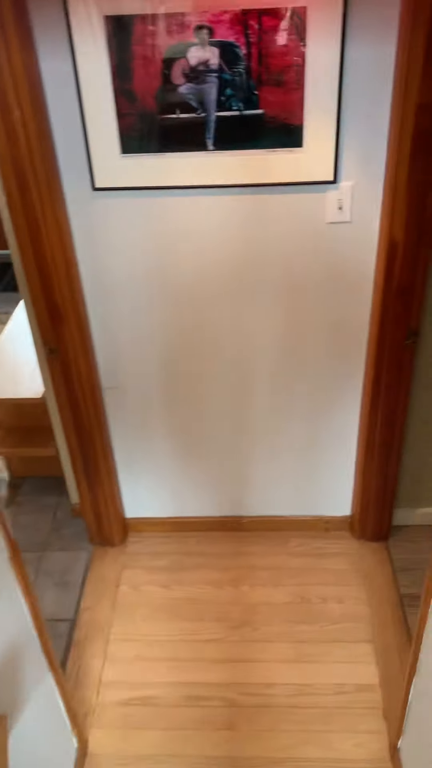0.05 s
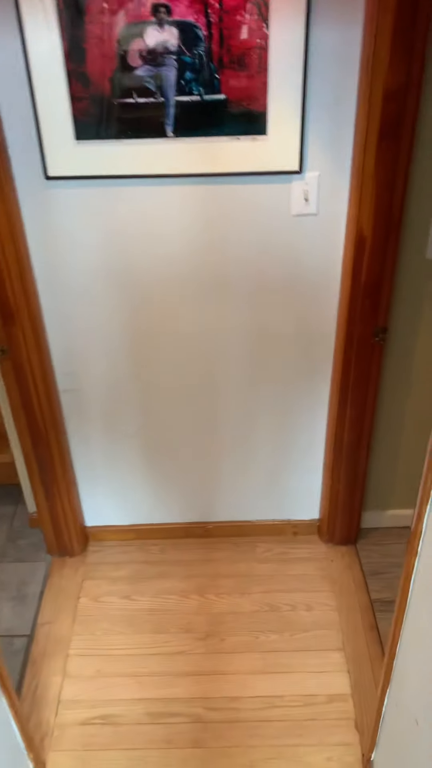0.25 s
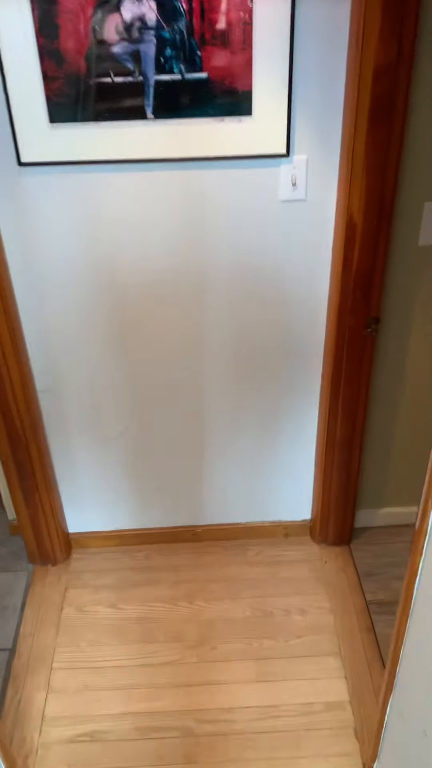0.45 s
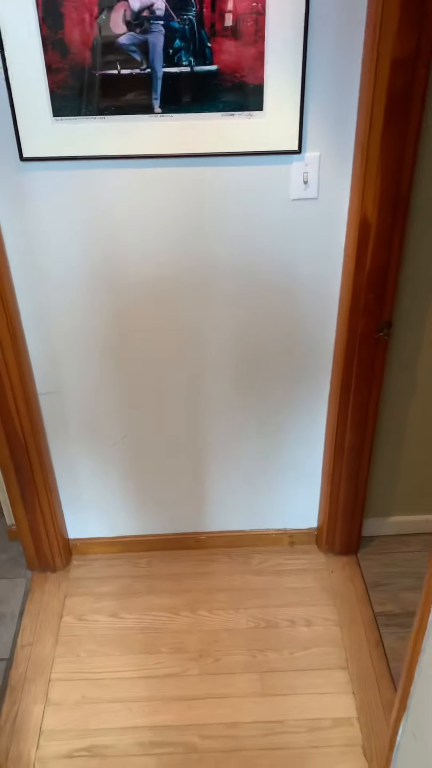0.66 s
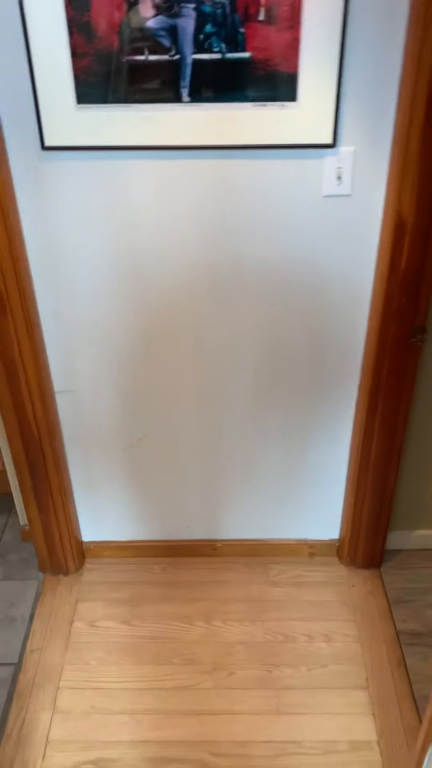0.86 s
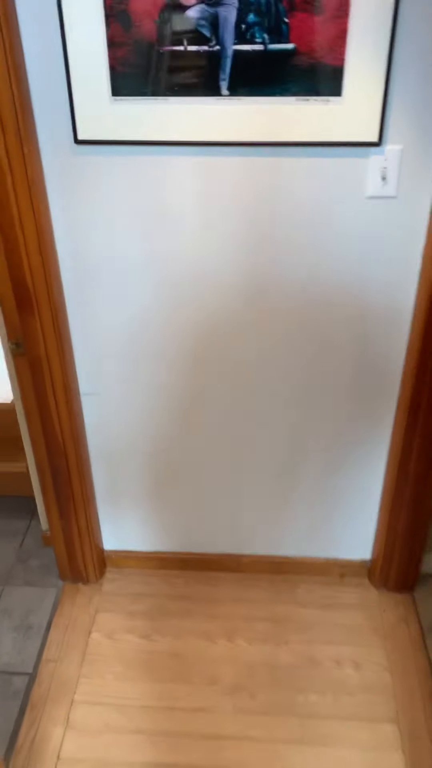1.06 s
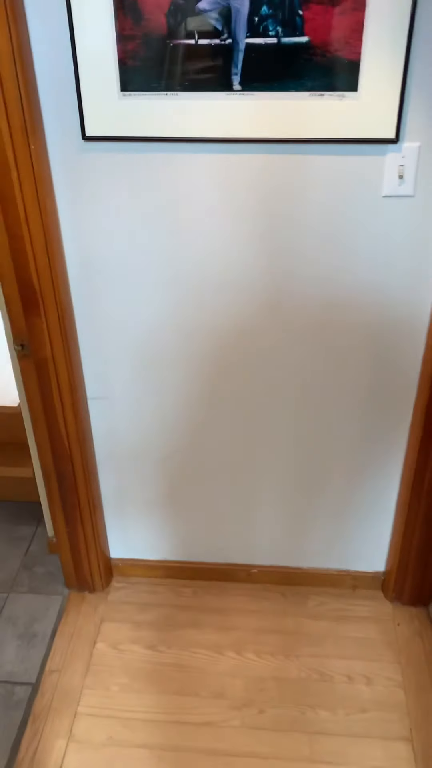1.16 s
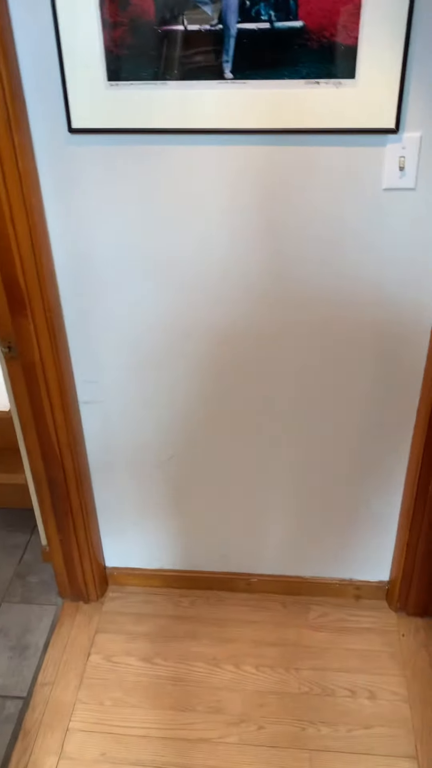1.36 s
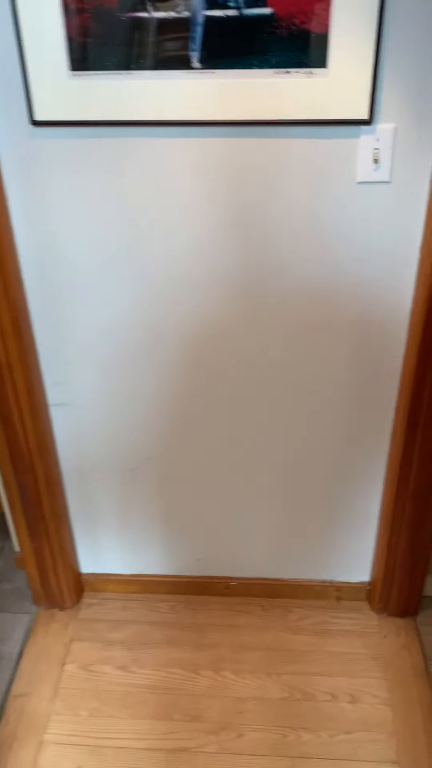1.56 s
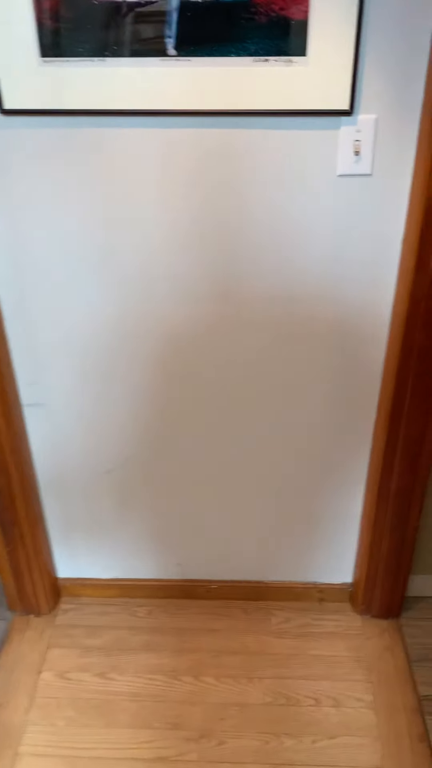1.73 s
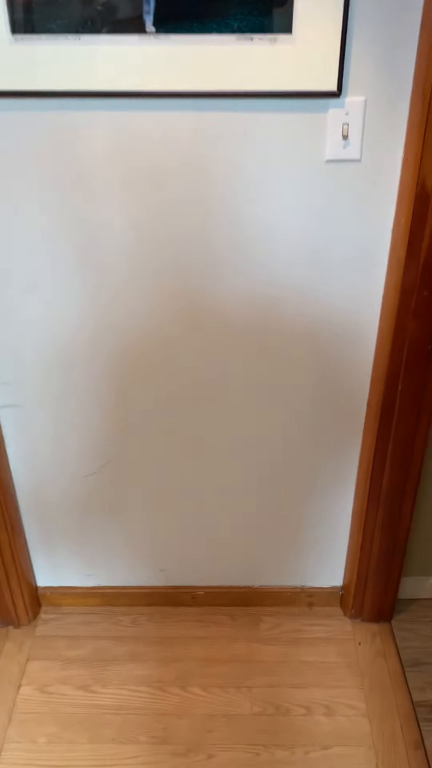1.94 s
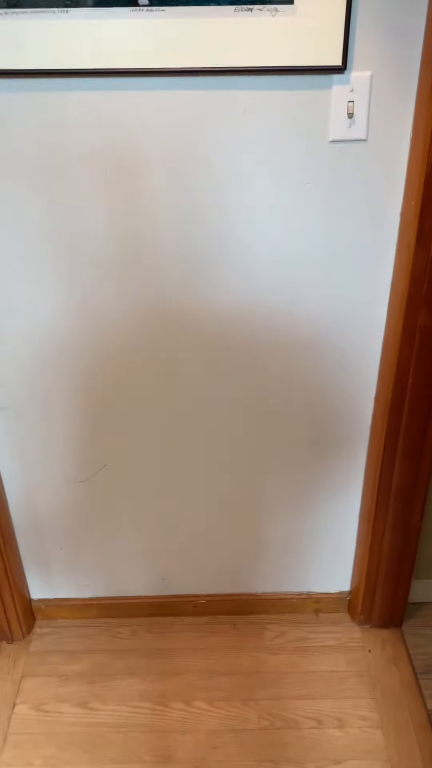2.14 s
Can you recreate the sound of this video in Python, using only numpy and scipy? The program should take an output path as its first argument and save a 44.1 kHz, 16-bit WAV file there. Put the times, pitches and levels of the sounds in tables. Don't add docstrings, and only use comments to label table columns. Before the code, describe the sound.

Barefoot steps thud and creak across indoor wooden boards, following a harsh close click

```python
import sys
import numpy as np
from scipy import signal
from scipy.fft import rfft, irfft
from scipy.io import wavfile
from scipy.ndimage import uniform_filter1d

SR = 44100
rng = np.random.default_rng(int(sys.argv[2]) if len(sys.argv) > 2 else 0)


def field_ratio(decibels):
    return 10 ** (np.asarray(decibels, dtype=float) / 20)


def dump_mix(stems):
    frames = np.atleast_2d(stems).T
    limited = np.clip(frames, -1, 1)
    pcm = np.round(limited * 32767).astype(np.int16)
    wavfile.write(sys.argv[1], SR, pcm)


N = 97020

# [f/Hz, density/dB]
AIR_SPECTRUM = [(20, 0), (85, 2.5), (160, -13.5), (300, -10.5), (700, -11.5), (900, -15.5), (4000, -23),
                (16000, -26)]
# [f/Hz, level/dB]
HUM_MODES = [(448, -81.5), (285, -80.5)]
# [f/Hz, level/dB, fade/(dB/s)]
WHINE_TONE = (678, -66, -5.5)
# [t/s, level/dB]
RUSTLE_LEVEL = [(0, -68.5), (.22, -65), (.3, -62.5), (.5, -66), (.6, -72), (.8, -77.5), (.9, -70.5),
                (1.25, -66), (1.45, -70), (1.6, -64.5), (1.67, -60), (1.77, -63), (1.81, -67),
                (1.94, -66.5), (2.0, -62.5), (2.09, -63), (2.2, -70)]
# [f/Hz, density/dB]
CLOTH_SPECTRUM = [(500, -12), (900, -0.5), (2200, -4.5), (3500, -6.5), (7500, -8), (10000, -5.5),
                  (13500, -7.5), (16000, -12)]
# [t/s, level/dB, f/Hz, length/s]
CLOTH_TICKS = [
    (1.748, -51, 6000, 0.0011),
    (1.847, -52, 9000, 0.0012),
    (2.037, -56, 9000, 0.0019),
    (2.062, -65, 9700, .035),
]
# [t/s, level/dB, fall/s, sag level/dB]
CATCH_SNAPS = [
    (.056595, .6, .0003, -29.5),
    (.060115, .6, .0003, -48),
    (.061248, .6, .00042, -45),
]
# [f/Hz, level/dB]
CATCH_MODES = [(10250, 0), (6200, -12), (13200, -14), (2620, -27), (1150, -31)]
# [t/s, level/dB]
WEIGHT_LEVEL = [(.175, -59.5), (.19, -57.5), (.3, -40), (.4, -51.5), (.49, -47.5), (.52, -57), (.565, -57),
                (.6, -62.5), (.99, -78), (1.012, -45.5), (1.18, -44.5), (1.3, -54.5), (1.56, -64),
                (1.68, -56), (1.8, -68.5), (2.015, -54), (2.035, -48.5), (2.2, -58)]
# [f/Hz, width/Hz, level/dB]
BOARD_MODES = [(191, 50, -4), (263.8, 66, -0.5), (320, 50, -6), (400, 42, -2.5), (470, 40, -4),
               (560, 70, -6.5), (680, 60, -11), (800, 90, -12.5), (1052.3, 150, -20.5), (130, 61, -5)]
# [t/s, level/dB, t60/s, tilt/(dB/octave), top f/Hz]
SKIN_SLAPS = [
    (.181, -47, 0.23, -6, 6000),
    (.234, -43.5, 0.23, -4.5, 13000),
    (.29, -55, 0.24, -5.5, 7000),
    (.445, -50.5, 0.31, -5.5, 6000),
    (0.509, -46.5, 0.033, -2.5, 5000),
    (1.006, -44, 0.24, -6, 9100),
    (1.119, -41.5, 0.22, -8.5, 4000),
    (1.14, -69, 1.2, -3.5, 9000),
    (2.027, -52, 0.34, -8.5, 9000),
]
# [t/s, length/s, level/dB, f/Hz]
BOARD_KNOCKS = [(.182, 0.014, -44.5, 750), (.182, 0.008, -47.5, 1470), (.236, 0.039, -43, 415),
                (.236, 0.034, -55, 1620), (.278, 0.015, -42.5, 470), (.357, 0.021, -37, 271),
                (.385, 0.025, -42, 205), (.445, 0.021, -47.5, 760), (.445, 0.012, -52, 1137),
                (.503, 0.059, -44, 285), (.504, 0.036, -46.5, 498.4), (1.008, 0.076, -46.5, 285),
                (1.117, 0.021, -44, 515), (1.124, 0.019, -47, 750), (2.032, 0.022, -54, 623),
                (1.17, 0.0096, -48.5, 410), (1.312, 0.017, -55.5, 470), (1.419, 0.024, -51, 437),
                (1.675, .025, -56, 301), (2.028, 0.021, -50.5, 286), (2.095, 0.015, -48.5, 287)]
# [t/s, length/s, level/dB, f/Hz]
JOIST_BOOMS = [(.183, 0.027, -37, 108), (.236, .028, -39, 87), (.278, 0.053, -39, 85),
               (.343, 0.0077, -29.5, 105), (.375, 0.024, -40.5, 96), (.503, 0.055, -49, 109.5),
               (.77, 0.021, -52.5, 92.2), (1.012, 0.049, -34.5, 98), (1.08, 0.093, -39.5, 102.5),
               (1.172, .045, -35.5, 102.5), (1.245, 0.068, -38.5, 90.7), (1.582, 0.028, -50.5, 80),
               (2.03, .018, -33, 91), (2.09, .11, -45, 86)]
# [start t/s, end t/s, level/dB, f/Hz, width/Hz]
SOLE_DRAG = (1.12, 1.46, -69, 2380, 420)


def evened(x):
    return x / np.sqrt(np.mean(x ** 2) + 1e-20)


def add(mix, s, sound):
    part = mix[round(s * SR):][:len(sound)]
    part += sound[:len(part)]


def curve(points):
    return field_ratio(np.interp(np.arange(N) / SR, *np.transpose(points)))


def coloured(points, patchy_db):
    hz = np.fft.rfftfreq(1024, 1 / SR)
    real, imag, patches = rng.standard_normal((N // 256 + 5, 513, 3)).T
    patches = uniform_filter1d(patches, size=14, axis=0)
    patches = evened(uniform_filter1d(patches, size=10, axis=1))
    f, db = np.transpose(points)
    density_db = np.interp(np.log(hz + 1), np.log(f + 1), db)[:, None]
    spectra = (real + 1j * imag) * field_ratio(density_db + patchy_db * patches)
    return evened(signal.istft(spectra, nperseg=1024, noverlap=768)[1][:N])


def resonate(x, hz, width):
    r = np.exp(-np.pi * width / SR)
    return 2 * signal.lfilter([1 - r], [1, -r * np.exp(2j * np.pi * hz / SR)], x).real


def house():
    t = np.arange(N) / SR
    air = field_ratio(-64) * coloured(AIR_SPECTRUM, patchy_db=1.23)
    hum = sum(field_ratio(db) * evened(resonate(rng.standard_normal(N), hz, 1.7)) for hz, db in HUM_MODES)
    hz, db, fade_db = WHINE_TONE
    whine = field_ratio(db + fade_db * t) * np.sin(2 * np.pi * hz * t)
    return air + hum + whine


def rustle():
    out = field_ratio(0.4) * curve(RUSTLE_LEVEL) * coloured(CLOTH_SPECTRUM, patchy_db=2.5)
    t = np.arange(3000) / SR
    for s, db, hz, length in CLOTH_TICKS:
        width = 1500 + 2.5 / length
        tick = evened(resonate(rng.standard_normal(len(t)), hz, width))
        add(out, s, field_ratio(db) * np.exp(-(t / length) ** 2) * tick)
    return out


def catch():
    rise_s, hold_s, ring_db, ring_s = .00008, .00046, -25, .0008
    push_db, sag_s, sag_late_s = -26, .0065, .0006
    out = np.zeros(N)
    for s, db, fall, sag_db in CATCH_SNAPS:
        start = int(s * SR) / SR
        t = np.maximum(np.arange(4000) / SR + (start - s), 0)
        late = np.maximum(t - hold_s, 0)
        decay = np.exp(-(late / fall) ** 2) + field_ratio(ring_db) * np.exp(-t / ring_s)
        shape = np.minimum(t / rise_s, 1) * decay
        ring = sum(field_ratio(mode_db) * np.sin(2 * np.pi * hz * t) for hz, mode_db in CATCH_MODES)
        sag = (1 - np.exp(-(t / sag_late_s) ** 2)) * np.exp(-t / sag_s)
        add(out, start, -field_ratio(db) * shape * ring + field_ratio(push_db) * shape - field_ratio(sag_db) * sag)
    return out


def boards():
    jolts_per_s, spread_db, weight_db = 440, 2.5, -4
    chance, side, size = rng.random((N, 3)).T
    jolts = (chance < jolts_per_s / SR) * np.sign(side - .5) * field_ratio(-spread_db * np.log(size + .01))
    rung = np.zeros(N)
    for hz, width, db in BOARD_MODES:
        mode = resonate(resonate(jolts, hz, 0.75 * width), hz, width)
        rung += field_ratio(db) * evened(mode)
    return field_ratio(weight_db) * curve(WEIGHT_LEVEL) * evened(rung)


def slaps():
    rise_s = 0.00155
    size = 16384
    out, t, hz = np.zeros(N), np.arange(size) / SR, np.fft.rfftfreq(size, 1 / SR)
    for s, db, t60, tilt_db, top_hz in SKIN_SLAPS:
        tilt = field_ratio(tilt_db * np.log2(hz / 1000 + .5)) / (1 + (hz / top_hz) ** 2)
        puff = evened(irfft(rfft(rng.standard_normal(size)) * tilt))
        add(out, s, field_ratio(db - 60 * t / t60) * (1 - np.exp(-t / rise_s)) * puff)
    return out


def struck(rows, rough, rise_s):
    sag_db, cut_s = -7, 0.0092
    out, t = np.zeros(N), np.arange(16000) / SR
    for s, length, db, hz in rows:
        shape = (1 - np.exp(-t / rise_s)) * field_ratio(sag_db * t / length)
        shape = shape * np.exp(-(np.maximum(t - length, 0) / cut_s) ** 2)
        noise = resonate(rng.standard_normal(len(t)), hz, 1.63 * hz)
        noise = evened(resonate(noise, hz, 0.36 * hz))
        add(out, s, field_ratio(db) * shape * (np.sin(2 * np.pi * hz * t) + rough * noise))
    return out


def hall(x):
    t60_s, edge_hz, spacing = .3, 4000, 22
    taps = np.zeros(SR // 2)
    at = np.arange(200, SR // 2 - spacing, spacing)
    at = at + rng.integers(0, spacing, len(at))
    taps[at] = rng.choice([-1., 1.], len(at))
    taps = taps * field_ratio(-60 * np.arange(len(taps)) / SR / t60_s)
    taps = resonate(taps, 0, edge_hz)
    return signal.fftconvolve(x, taps / np.linalg.norm(taps))[:N]


def drag():
    start, end, db, hz, width = SOLE_DRAG
    band = evened(resonate(resonate(rng.standard_normal(N), hz, width), hz, width))
    ease = curve([(start - .05, -30), (start, 0), (end, -3), (end + 0.06, -30)])
    return field_ratio(db) * ease * band


def scene():
    around = house() + rustle() + catch()
    feet = boards() + slaps()
    knocks = struck(BOARD_KNOCKS, rough=.6, rise_s=0.0013)
    feet = feet + knocks + field_ratio(-19) * hall(knocks)
    feet = feet + struck(JOIST_BOOMS, rough=.2, rise_s=0.0029)
    return (around + feet + drag())[None]


def top_cut(x):
    return signal.sosfilt(signal.butter(12, 16250, fs=SR, output="sos"), x)


def record(dry):
    clip = 1.05
    return top_cut(np.clip(dry, -clip, clip))


dry = scene()
out = record(dry)
dump_mix(out)
```